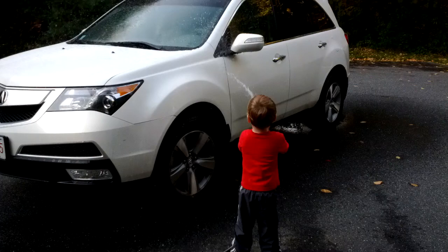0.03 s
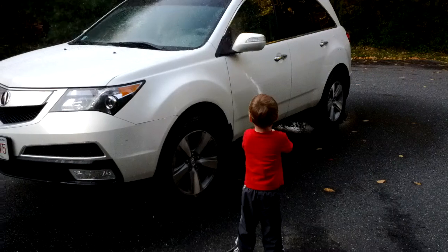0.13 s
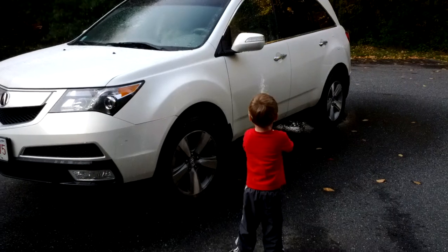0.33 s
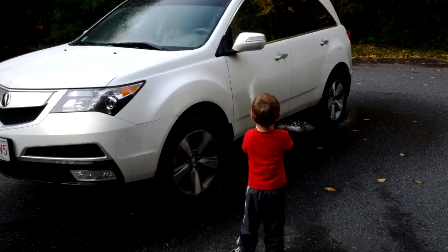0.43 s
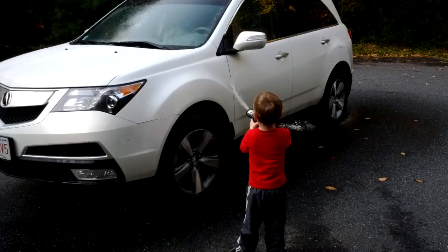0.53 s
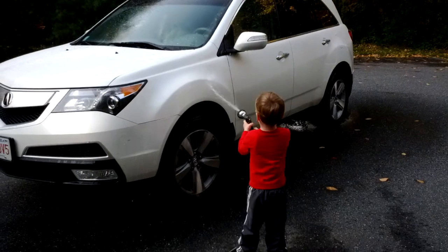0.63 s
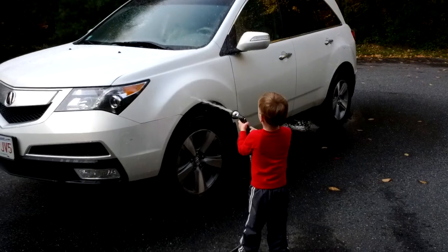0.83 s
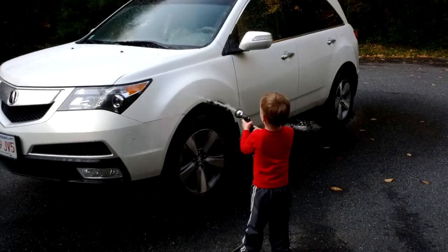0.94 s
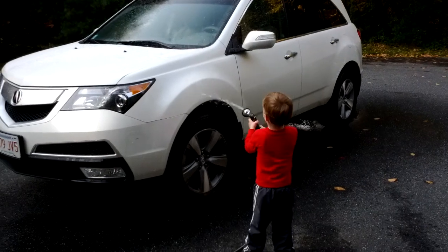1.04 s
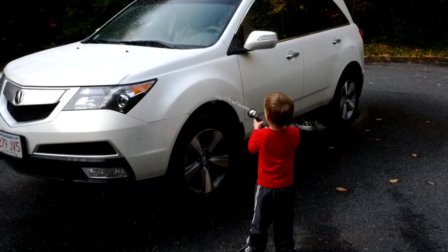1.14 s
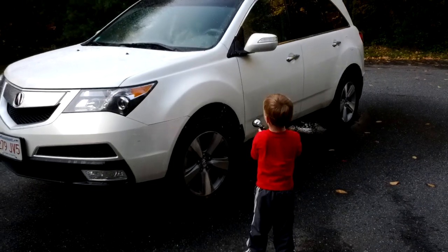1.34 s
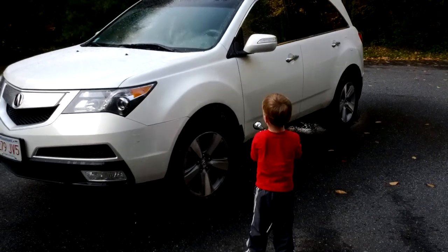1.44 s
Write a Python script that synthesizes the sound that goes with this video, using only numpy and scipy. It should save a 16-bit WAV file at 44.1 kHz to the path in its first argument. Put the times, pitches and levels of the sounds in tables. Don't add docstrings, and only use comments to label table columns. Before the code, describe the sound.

Water spray from a hose nozzle crackles brightly on a parked car, then dwindles to drips

```python
import sys
import numpy as np
from scipy import signal
from scipy.fft import rfft, irfft
from scipy.io import wavfile

SR = 44100
rng = np.random.default_rng(int(sys.argv[2]) if len(sys.argv) > 2 else 0)


def natural_amplitude(level_db):
    exponent = np.asarray(level_db, float) / 20
    return 10 ** exponent


def inscribe(sig):
    pcm = np.round(np.clip(np.atleast_2d(sig).T, -1, 1) * 32767)
    wavfile.write(sys.argv[1], SR, pcm.astype(np.int16))


N = 66150
TIME_S = np.arange(N) / SR


def rms_one(x):
    return x / np.sqrt(np.mean(x ** 2) + 1e-20)


def gain_curve(rows):
    time_s, level_db = np.transpose(rows)[:2]
    return natural_amplitude(np.interp(TIME_S, time_s, level_db))


def drift(rate_hz):
    r = np.exp(-2 * np.pi * rate_hz / SR)
    wander = signal.lfilter([1], [1, -2 * r, r * r], rng.standard_normal(N + SR))
    return rms_one(wander[SR:])


def colour(x, spectrum):
    size = 2 ** 17
    hz = np.arange(size // 2 + 1) * SR / size + 1
    point_hz, point_db = np.transpose(spectrum)
    gain = natural_amplitude(np.interp(np.log(hz), np.log(point_hz), point_db))
    cepstrum = irfft(np.log(gain), size)
    cepstrum[1:size // 2] *= 2
    cepstrum[size // 2 + 1:] = 0
    return irfft(rfft(x, size) * np.exp(rfft(cepstrum)), size)[:N]


def resonance(x, hz, width_hz):
    r = np.exp(-np.pi * width_hz / SR)
    zeros = np.array([1, 0, -1]) * (1 - r * r) / 2
    poles = [1, -2 * r * np.cos(2 * np.pi * hz / SR), r * r]
    return signal.lfilter(zeros, poles, x + 1e-18)


def double_resonance(x, hz, width_hz):
    return resonance(resonance(x, hz, width_hz), hz, width_hz)


ECHO_S, ECHO_DB = .00207, -5


def with_echo(at, sizes, jitter):
    echo_jitter_s = .00012
    clicks = np.zeros(N + SR)
    lag = ((ECHO_S + echo_jitter_s * jitter) * SR).astype(int)
    np.add.at(clicks, at, sizes)
    np.add.at(clicks, at + lag, sizes * natural_amplitude(ECHO_DB))
    return clicks[:N]


# time_s, level_db
SPRAY_LEVEL = [(.125, -28), (.2, -28), (.33, -28.5), (.43, -26), (.5, -22.5), (.6, -24), (.66, -20.5),
               (.76, -19.5), (.95, -24.5), (1.01, -23.5), (1.05, -24), (1.14, -29), (1.175, -31),
               (1.205, -36.5), (1.24, -38), (1.29, -42), (1.45, -42.5), (1.5, -43.5)]
# freq_hz, density_db_per_hz
BURST_COLOUR = [(1760, -54.5), (3000, -23.5), (4260, -14.5), (5370, -15.5), (6950, -8), (7940, -9),
                (10700, 1.5), (12200, -3), (16000, -16.5)]


def droplets():
    drops_per_s, spread_db, clump_db, ring_cycles = 1600, 3.4, 2.4, 7.5
    drops_db, mist_db, mist_flicker_db = -4, -6, 1.6
    sizes = natural_amplitude(spread_db * np.minimum(rng.exponential(1, N), 2.2)) * rng.choice([-1, 1], N)
    clumping = .7 * drift(60) + .7 * drift(250)
    born = rng.random(N) < drops_per_s * natural_amplitude(clump_db * clumping) / SR
    pitches_hz = np.geomspace(3000, 18000, 12)
    dealt = rng.integers(0, 12, N)
    jitter = rng.standard_normal(N)
    pops = np.zeros(N)
    for k, hz in enumerate(pitches_hz):
        at = np.flatnonzero(born & (dealt == k))
        pops += resonance(with_echo(at, sizes[at], jitter[at]), hz, 2.2 * hz / ring_cycles)
    mist = rng.standard_normal(N) * natural_amplitude(mist_flicker_db * (drift(27) + drift(410)))
    pops = natural_amplitude(drops_db) * rms_one(colour(pops, BURST_COLOUR))
    mist = natural_amplitude(mist_db) * rms_one(colour(mist, BURST_COLOUR))
    return gain_curve(SPRAY_LEVEL) * (pops + mist)


# start_s,
# peak_db, pitch_hz
LARGE_DROPS = [(0.1264, -12.8, 10900), (0.1313, -10.4, 11500), (0.2274, -13.3, 10800),
               (0.2411, -11.5, 11500), (0.3375, -9.5, 11300), (0.3497, -7.6, 11100), (0.3862, -9.6, 9300),
               (0.4127, -6.6, 11000), (0.4424, -8.9, 11700), (0.4648, -7.5, 11500), (0.4976, -4.9, 11700),
               (0.5233, -7.2, 10800), (0.5862, -7.0, 10700), (0.5977, -8.0, 9900), (0.6687, -1.2, 10700),
               (0.6709, -2.6, 10300), (0.7705, -4.8, 10800), (0.8834, -6.3, 11300), (0.8982, -7.6, 10700),
               (0.9138, -8.7, 9700), (1.0049, -2.7, 11100), (1.0735, -11.3, 10900), (1.0976, -11.1, 10900),
               (1.1422, -10.6, 10200), (1.1443, -9.9, 10300), (1.182, -11.7, 10600), (1.2233, -15.0, 11100),
               (1.2556, -22.1, 10900), (1.3058, -16.5, 11100)]
# start_s, peak_db, pitch_hz
FURTHER_DROPS = [(0.1511, -14.0, 11100), (0.1642, -14.0, 11000), (0.1815, -14.0, 10800),
                 (0.2516, -13.0, 11700), (0.2655, -15.0, 10500), (0.2773, -14.0, 11400),
                 (0.2983, -15.0, 10800), (0.3003, -15.0, 11500), (0.3078, -16.0, 10200),
                 (0.3331, -15.0, 10400), (0.3579, -12.0, 11100), (0.3634, -11.0, 10600),
                 (0.3659, -11.0, 10600), (0.3743, -13.0, 9900), (0.3945, -13.0, 10100),
                 (0.4326, -13.0, 10800), (0.4375, -14.0, 11700), (0.4475, -13.0, 11200),
                 (0.4498, -11.0, 11900), (0.4563, -11.0, 11300), (0.4578, -11.0, 10500),
                 (0.4636, -10.0, 11200), (0.4722, -9.0, 10400), (0.4749, -10.0, 10700),
                 (0.4954, -11.0, 11500), (0.5004, -9.0, 11600), (0.5031, -10.0, 10600),
                 (0.5066, -10.0, 10800), (0.5652, -12.0, 10900), (0.5782, -10.0, 10400),
                 (0.5843, -12.0, 10800), (0.5944, -11.0, 10900), (0.6242, -10.0, 10500),
                 (0.6283, -10.0, 10400), (0.6337, -11.0, 10300), (0.6612, -9.0, 10700),
                 (0.6653, -8.0, 10500), (0.6887, -7.0, 11100), (0.7111, -8.0, 11500),
                 (0.7309, -8.0, 11200), (0.7539, -8.0, 11000), (0.7575, -7.0, 10000),
                 (0.7617, -8.0, 10400), (0.8039, -8.0, 10500), (0.8297, -10.0, 10300),
                 (0.8935, -10.0, 10700), (0.9096, -12.0, 11400), (0.9119, -9.0, 11000),
                 (0.9565, -10.0, 10400), (0.9648, -12.0, 10500), (0.9865, -12.0, 10600),
                 (1.0284, -10.0, 11300), (1.0321, -13.0, 11300), (1.0343, -13.0, 10600),
                 (1.0528, -14.0, 11200), (1.113, -14.0, 9400), (1.1183, -14.0, 10200),
                 (1.1288, -13.0, 11100), (1.1316, -14.0, 10700), (1.1332, -15.0, 10500)]
# start_s, peak_db, pitch_hz
SILL_DRIPS = [(1.1945, -28, 10900), (1.2135, -13, 10700), (1.216, -15, 10100), (1.2195, -18, 10800),
              (1.23, -22, 12300), (1.244, -35, 11500), (1.313, -26, 12000), (1.2735, -34, 10500),
              (1.2953, -39, 11000), (1.32, -27, 10000), (1.362, -26, 9900), (1.3765, -23, 12600),
              (1.389, -26.5, 10000), (1.4125, -35, 12500), (1.422, -48, 10440), (1.4315, -45, 11350),
              (1.4455, -44, 11800), (1.454, -31, 9600), (1.4605, -28, 12400)]


def bright_drops():
    return list(LARGE_DROPS) + list(FURTHER_DROPS) + list(SILL_DRIPS)


def splats():
    splat_db, crack_db, t60_s = -1, -5, .00095
    echo_from_s, echo_until_s, faint_echo_db = .6, 1.19, -14
    size = 300
    out = np.zeros(N + SR)
    click = np.eye(1, N)[0]
    crack = colour(click, BURST_COLOUR)[:size]
    crack = natural_amplitude(crack_db) * crack / np.abs(crack).max()
    lag = int(ECHO_S * SR)
    for start_s, peak_db, pitch_hz in bright_drops():
        ring = double_resonance(click[:size], pitch_hz, 2.2 / t60_s)
        burst = ring / np.abs(ring).max() + crack
        burst = natural_amplitude(peak_db + splat_db) * burst / np.abs(burst).max()
        on_wing = echo_from_s < start_s < echo_until_s
        at = int(start_s * SR)
        out[at:at + size] += burst
        out[at + lag:at + lag + size] += burst * natural_amplitude(ECHO_DB if on_wing else faint_echo_db)
    return out[:N]


# start_s, peak_db, pitch_hz
HEAVY_DROPS = [(0.1163, -39, 3660), (0.1498, -29, 6400), (0.324, -35, 3660), (0.3853, -18, 6050),
               (0.554, -22, 6300), (0.5845, -19, 5650), (0.6684, -16, 4300), (0.955, -20, 5830),
               (0.9869, -18, 6100), (1.0288, -14, 3930), (1.141, -22, 6650), (1.2122, -30, 4960),
               (1.3043, -47.5, 6500), (1.4544, -37, 6200)]


def plops():
    plop_db, width_hz, size = -4, 2600, 400
    out = np.zeros(N + SR)
    for start_s, peak_db, pitch_hz in HEAVY_DROPS:
        ring = double_resonance(np.eye(1, size)[0], pitch_hz, width_hz)
        at = int(start_s * SR)
        out[at:at + size] += natural_amplitude(peak_db + plop_db) * ring / np.abs(ring).max()
    return out[:N]


def spatter_envelope(drops, spread_s):
    spatter_db = -13
    marks = np.zeros(N)
    for start_s, peak_db, _ in drops:
        marks[int((start_s + spread_s / 2) * SR)] += natural_amplitude(peak_db + spatter_db)
    offset_s = np.arange(-400, 401) / SR
    return np.convolve(marks, np.exp(-.5 * (offset_s / spread_s) ** 2), "same")


def spatter():
    bright_s, dull_s = .0006, .002
    noise = rng.standard_normal((2, N))
    bright = rms_one(resonance(colour(noise[0], BURST_COLOUR), 11000, 7000))
    dull = rms_one(resonance(noise[1], 5630, 5700))
    bright = spatter_envelope(bright_drops(), bright_s) * bright
    return bright + spatter_envelope(HEAVY_DROPS, dull_s) * dull


# time_s, level_db, aim (0 door, 1 wheel arch)
JET_PUSH = [(.125, -42.5, -0.33), (.2, -43, -1.8), (.25, -50, -0.39), (.38, -49, -0.24),
            (0.47, -40.5, 0.068), (.54, -39.5, 0.14), (.65, -46, -0.71), (.675, -37, 0.35),
            (.77, -36, 0.97), (.82, -35, 0.73), (.87, -34.5, 0.85), (.92, -42.5, 0.51), (.96, -33.5, 0.73),
            (1.015, -41.5, 0.38), (1.055, -38.5, 1.12), (1.14, -44.5, 1.95), (1.24, -57, 2.2),
            (1.32, -68.5, 1.37)]
# time_s, level_db
JET_SPLASH = [(0.13, -54), (0.44, -56), (.54, -50), (.59, -46.5), (.62, -48.5), (0.7, -39.5),
              (0.828, -39.5), (0.87, -49.5), (0.912, -38), (0.94, -46.5), (1.01, -48.5), (1.035, -44.5),
              (1.06, -50.5), (1.178, -52.5), (1.308, -63.5), (1.5, -64.5)]
# freq_hz, density_db_per_hz
THUD_COLOUR = [(200, -19.5), (400, -3), (600, -5), (1000, -3.5), (1500, -4), (2400, -7), (3300, -6),
               (5000, -27)]
# freq_hz, width_hz, level_db, gain_towards_wheel_arch_db
PANEL_MODES = [(309, 43, -9.5, -1), (399.4, 19, -19.5, 14), (449.2, 19, -31, 18.5), (440.4, 44, -7, -8.5),
               (532.6, 20, -13, 6.5), (569, 26.7, -1.5, 5), (638, 59, -3.5, 0.5), (755.7, 28, -4, 0),
               (829, 55, -7, 0), (970, 72, -20, 6.5), (1109, 35, -14.5, 4), (1356, 65, -16, 0),
               (1530, 72, -15, -2), (2055, 110, -15, 1.5)]


def panel():
    ring_db, thud_db, flicker_db, mode_wander_db = -1, 2, 1.5, 3.03
    time_s, _, aim = np.transpose(JET_PUSH)
    aim = np.interp(TIME_S, time_s, np.clip(aim, -1, 2))
    jet = rng.standard_normal((2, N)) * natural_amplitude(flicker_db * drift(23))
    rings = np.zeros(N)
    for k, (hz, width_hz, mode_db, aim_db) in enumerate(PANEL_MODES):
        gain = natural_amplitude(mode_db + aim_db * aim + mode_wander_db * drift(5))
        rings += (-1) ** k * gain * double_resonance(jet[0], hz, width_hz)
    rings = gain_curve(JET_PUSH) * natural_amplitude(ring_db) * rms_one(rings)
    thud = gain_curve(JET_SPLASH) * natural_amplitude(thud_db) * rms_one(colour(jet[1], THUD_COLOUR))
    return rings + thud


# time_s, level_db
NOZZLE_FLOW = [
    (.12, -39),
    (.45, -40.5),
    (.65, -42),
    (.9, -45.5),
    (1.1, -46),
    (1.2, -58),
    (1.3, -83),
    (1.5, -67),
]
# freq_hz, density_db_per_hz
NOZZLE_COLOUR = [(900, -8.5), (1500, -18.5), (2200, -5), (2700, -4), (3200, -4), (3700, 2), (5000, -14),
                 (7000, -9)]


def nozzle():
    flicker_db = 2.0
    hiss = rms_one(colour(rng.standard_normal(N), NOZZLE_COLOUR))
    return gain_curve(NOZZLE_FLOW) * natural_amplitude(flicker_db * drift(28)) * hiss


# time_s, level_db
DOOR_REFLECTION = [
    (.12, -7),
    (.165, -.3),
    (.21, -8),
    (.275, -16),
    (.325, -.3),
    (.37, -8),
    (.42, -.3),
    (.47, -6),
]


def door_reflection(wet):
    notch_hz, width_hz, until_s, fade_s = 2680, 480, .47, .12
    on_door = np.clip(1 - (TIME_S - until_s) / fade_s, 0, 1)
    depth = on_door * gain_curve(DOOR_REFLECTION)
    for _ in range(2):
        wet = wet - depth * resonance(wet, notch_hz, width_hz)
    return wet


# time_s, level_db
HUM_LEVEL = [(0.13, -64), (0.2, -50), (0.3, -61), (0.4, -37.5), (0.484, -50.5), (0.652, -41.5),
             (0.736, -52), (1.1, -56), (1.3, -56.5), (1.36, -46), (1.42, -53.5), (1.5, -51.5)]
# freq_hz, density_db_per_hz
FAR_COLOUR = [(12, -26), (20, -4.5), (151, -8), (185, -16), (225, -5.5), (275, -16.5), (489, -68),
              (715, -25.5), (1500, -41.5), (1950, -102), (3300, -120)]


def rumble():
    hum_hz, hum_width_hz, hum_db = 154, 22, -2
    far_db, far_wander_db = -48, 2.55
    noise = rng.standard_normal((2, N))
    hum = rms_one(resonance(noise[1], hum_hz, hum_width_hz))
    hum = gain_curve(HUM_LEVEL) * natural_amplitude(hum_db) * hum
    return natural_amplitude(far_db + far_wander_db * drift(2.6)) * rms_one(colour(noise[0], FAR_COLOUR)) + hum


def scene():
    wet = droplets() + splats() + plops() + spatter() + panel() + nozzle()
    return (door_reflection(wet) + rumble())[None]


def band_limit(x):
    return signal.sosfilt(signal.butter(12, 16510, fs=SR, output="sos"), x)


def record(dry):
    start_s, fade_s, cutoff_hz = .1148, .0013, 15950
    gate = np.clip((TIME_S - start_s) / fade_s, 0, 1)
    lowpass = signal.ellip(12, .5, 65, cutoff_hz, fs=SR, output="sos")
    mix = signal.sosfilt(lowpass, dry * gate)
    return band_limit(mix)


dry = scene()
out = record(dry)
inscribe(out)
```